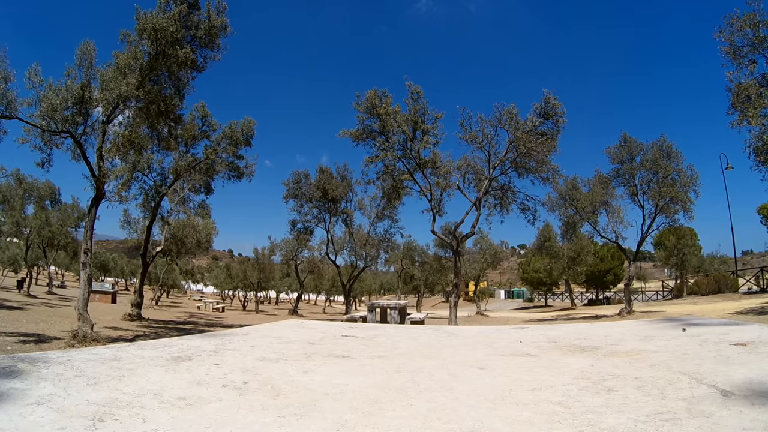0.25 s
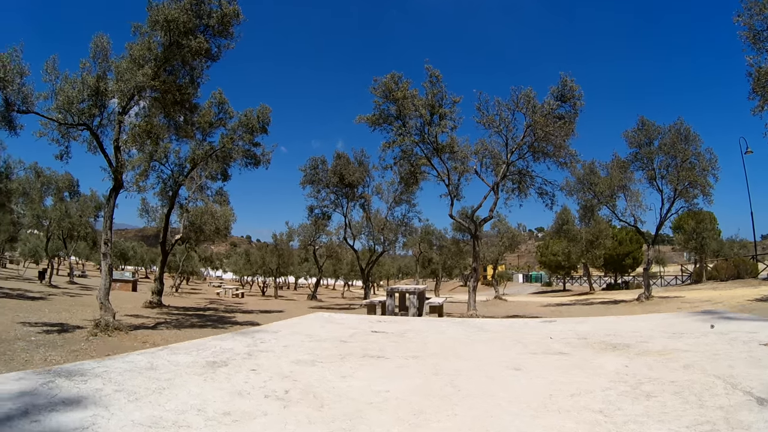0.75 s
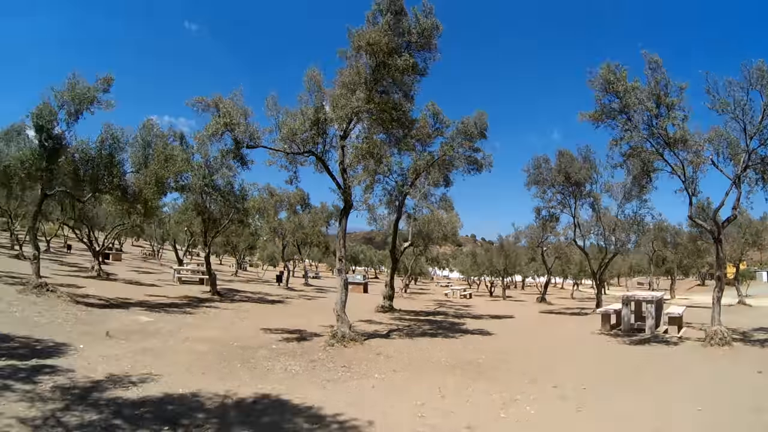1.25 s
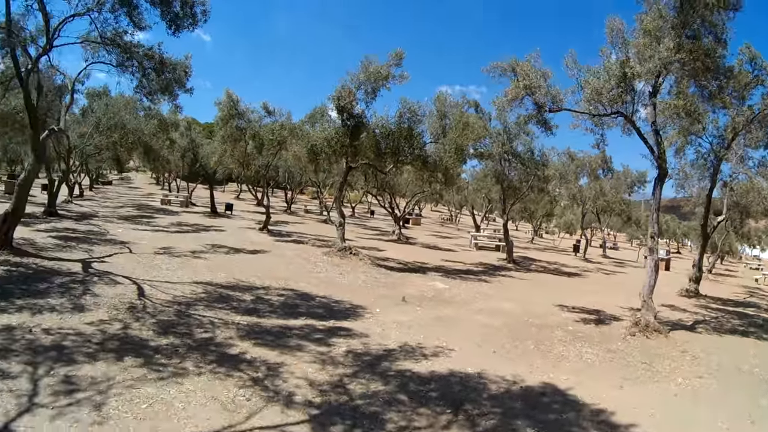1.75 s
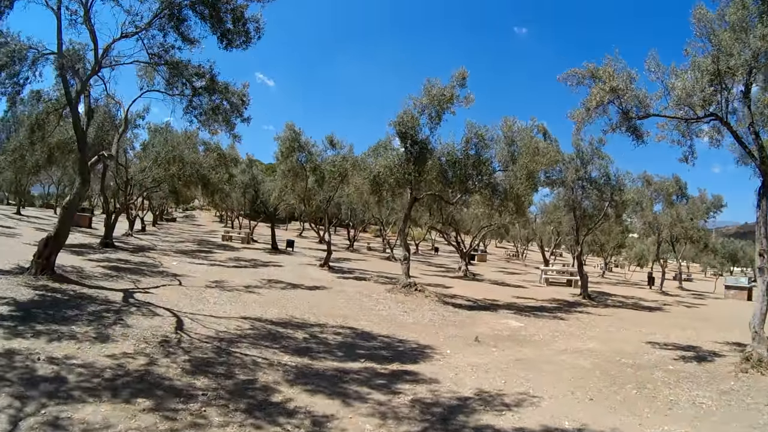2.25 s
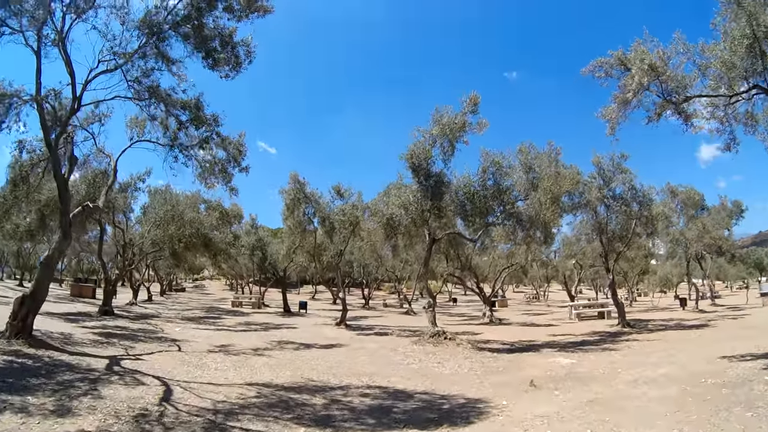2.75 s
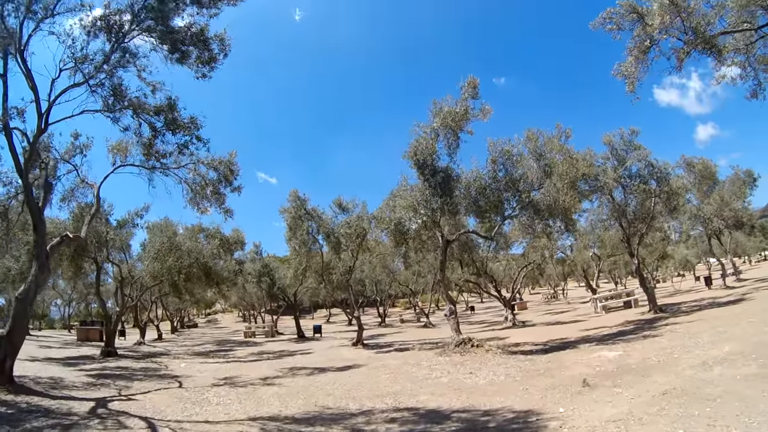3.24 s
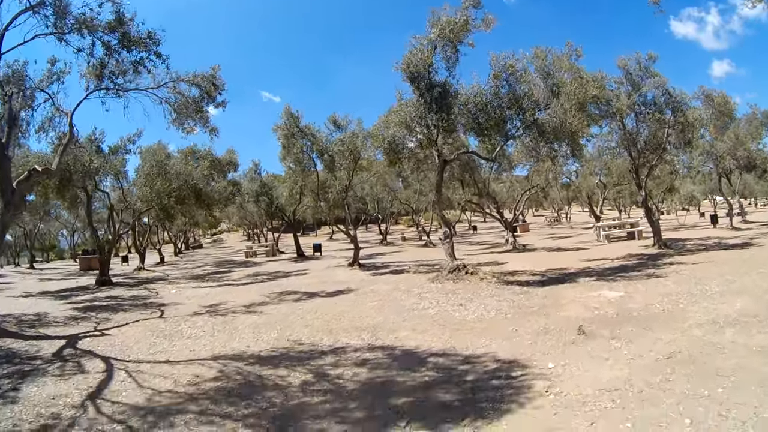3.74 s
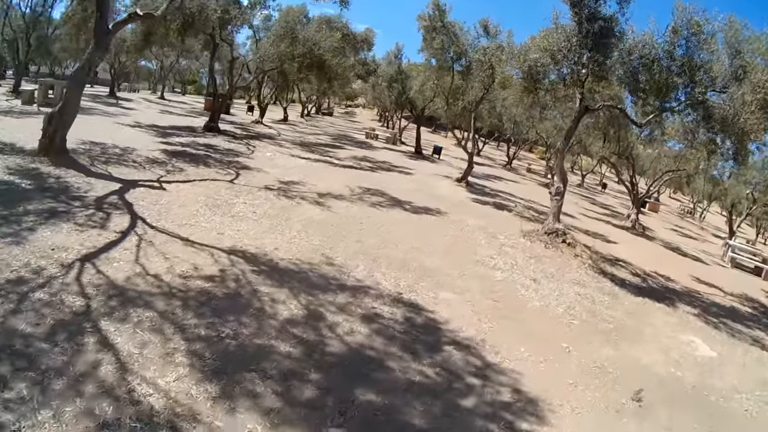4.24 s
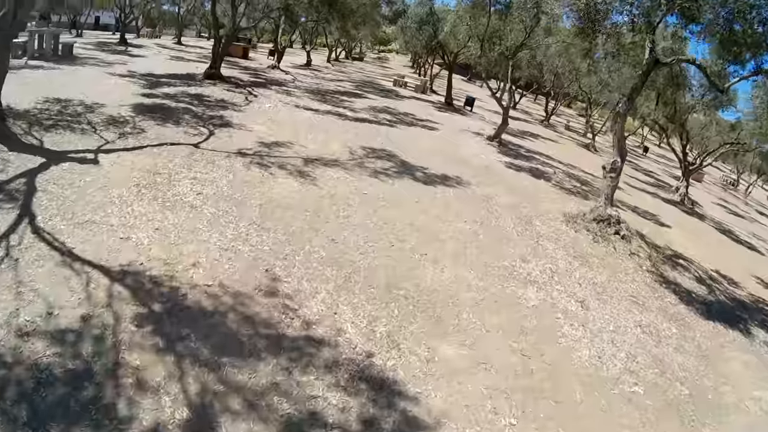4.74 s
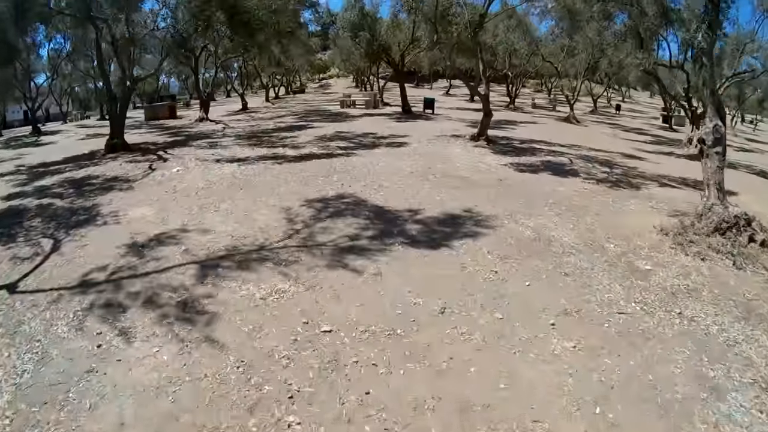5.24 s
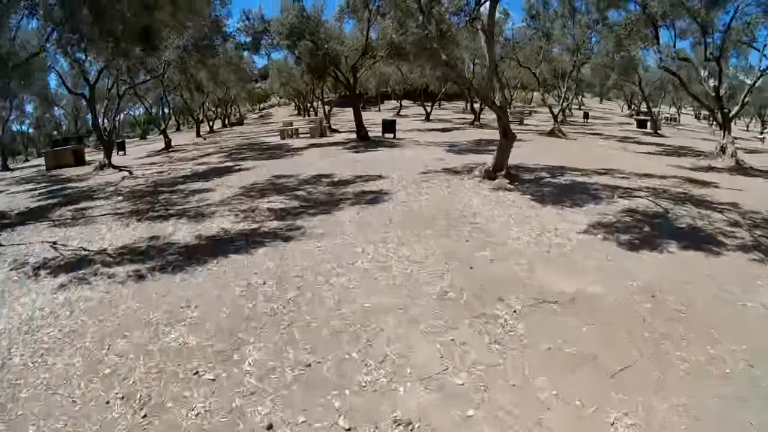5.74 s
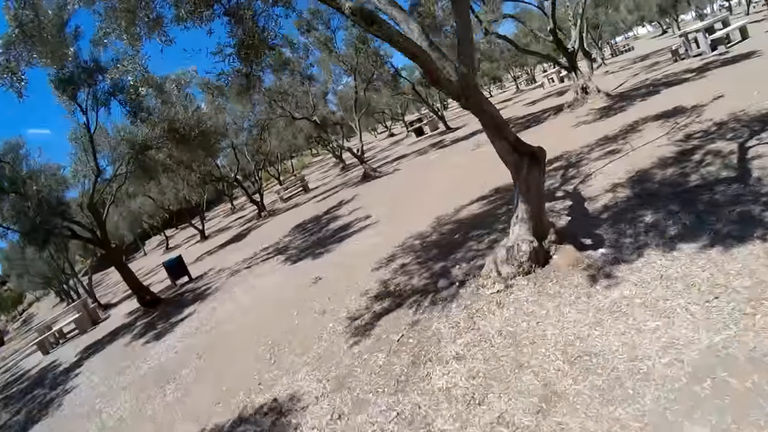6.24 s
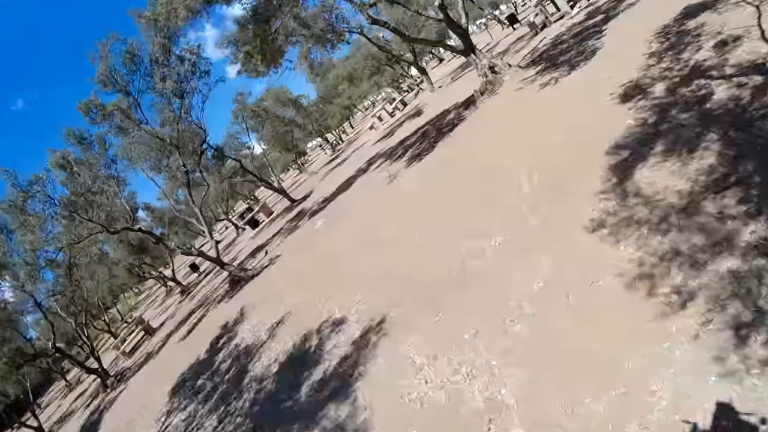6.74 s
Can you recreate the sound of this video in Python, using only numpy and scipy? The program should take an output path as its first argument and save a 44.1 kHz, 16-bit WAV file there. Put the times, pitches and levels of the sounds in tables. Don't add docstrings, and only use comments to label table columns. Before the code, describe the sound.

Small drone rotors idle softly for half a second, then leap to a loud, beating whine that strains and crackles in the onboard microphone.

```python
import sys
import numpy as np
from scipy import signal
from scipy.io import wavfile
from scipy.ndimage import uniform_filter1d

SR = 44100
rng = np.random.default_rng(int(sys.argv[2]) if len(sys.argv) > 2 else 0)


def store_wav(level_fs):
    pcm = np.round(np.clip(np.atleast_2d(level_fs), -1, 1) * 32767)
    wavfile.write(sys.argv[1], SR, pcm.T.astype(np.int16))


def to_linear_factor(level_db):
    exponent = np.asarray(level_db, float) / 20
    return 10 ** exponent


N = 308259

# t/s, blade rate f/Hz, tone level/dB
LEAD_ROTOR = [(0, 172, -41.5), (.1, 157.1, -47.5), (.4, 223.1, -44), (.5, 296, -23.5), (.62, 363.3, -20.5),
              (.8, 407.1, -17.5), (1, 431.7, -17), (1.3, 423.2, -19), (1.55, 368.8, -16.5),
              (1.9, 389.8, -15), (2.8, 401.1, -14), (3.55, 388.5, -13.5), (4.15, 377.7, -13.5),
              (4.72, 357.9, -17.5), (5.15, 374.5, -19), (5.8, 381.1, -17), (6.15, 345.4, -20.5),
              (6.85, 376.6, -20)]
LOW_ROTOR = [(0, 158.8, -44.5), (.3, 184.7, -41), (.46, 261, -22.5), (.57, 258.8, -24.5),
             (.81, 349.9, -22.5), (1.05, 330.5, -20), (1.7, 336, -23), (2.2, 386.8, -22),
             (2.82, 381.5, -18), (3, 352, -26.5), (3.5, 345.3, -22.5), (3.85, 379.8, -21), (4.2, 377, -20),
             (4.35, 339.4, -21.5), (4.87, 314.5, -28), (5.2, 343.6, -24.5), (6.2, 277.6, -30),
             (6.85, 332.3, -28)]
HIGH_ROTOR = [(.7, 415, -32), (1, 472, -20.5), (1.25, 436.3, -25.5), (1.5, 396.1, -37), (2.4, 419, -30),
              (2.82, 467.1, -21), (3.02, 432.2, -22.5), (3.3, 422.8, -18), (3.55, 427.3, -29),
              (3.8, 416.3, -13.5), (4, 390.2, -21.5), (4.27, 409.4, -47), (4.6, 404.6, -26.5),
              (5, 445, -20.5), (6, 448.2, -25), (6.15, 414.9, -22), (6.6, 422, -26), (6.85, 456.5, -24)]
NEAR_ROTOR = [(5.5, 443.6, -45.5), (5.9, 451, -28), (6.05, 397.2, -24.5), (6.18, 374, -23.5),
              (6.4, 500, -26.5), (6.55, 523.4, -33), (6.7, 500, -19), (6.85, 436, -21), (6.98, 434, -20)]
# start t/s, length t/s, ramp t/s, rise of blade rate f/Hz
SURGES = [
    (1.928, 0.24, 0.13, 33),
    (2.8, .73, .19, 56),
    (3.56, 0.44, 0.22, 69),
    (3.902, .2, 0.098, 30),
    (4.26, .2, 0.077, 20),
    (4.37, 0.34, .12, 74),
    (2.46, .2, 0.0985, -9),
    (5.15, .91, .14, 46),
    (5.35, .2, .1, -15.5),
    (6.22, 0.61, 0.15, 66),
]
# start t/s, length t/s, ramp t/s, rise of blade rate f/Hz
STEERING = [
    (.59, .16, 0.07045, 14),
    (1.14, .26, 0.1199, 13),
    (1.4, 0.19, .1, 25),
    (2.56, .2, .08, -7),
    (4.4, .26, 0.1007, 12),
    (4.9, 0.26, .1, 10),
]


def four_rotors():
    surge_hz, steer_hz = pushes(SURGES), pushes(STEERING)
    return [
        rotor(LEAD_ROTOR, surge_hz - .3 * steer_hz, surge_db=1.07, rich_db=-0.4, mid_db=0.5, top_db=-2.5),
        rotor(LOW_ROTOR, .4 * surge_hz + steer_hz, surge_db=5.0, rich_db=-1.5, mid_db=2.0, top_db=-2),
        rotor(HIGH_ROTOR, surge_hz, surge_db=-0.5, rich_db=-1.5, mid_db=-3.5, top_db=8.5),
        rotor(NEAR_ROTOR, 0 * surge_hz, surge_db=0, rich_db=3.0, mid_db=-1, top_db=-3),
    ]


# multiple of the blade rate, level/dB
ORDERS = [(.5, -30), (1, 0), (1.5, -36), (2, -11), (3, -18), (3.5, -31), (4, -21), (4.5, -30), (5, -28),
          (6, -31), (7, -34), (8, -35), (9, -36), (10, -37), (12, -38)]
# t/s, lift of the octave level/dB, lift of higher orders level/dB
SHARPNESS = [(.3, 12, 7), (.5, 5, 9), (.7, -3, -2), (1.4, -2, -5), (1.6, 4, -6), (2.1, 3, -4), (2.3, 1, -4),
             (3.4, 1, -2), (3.8, 0, 1), (4.9, 0, 0), (5.4, 4, 12), (5.9, 4, 13), (6.15, 4, 8), (6.5, 4, 13),
             (6.9, 2, 4)]


def rotor(rows, surge_hz, surge_db, rich_db, mid_db, top_db):
    hz = curve(rows, 1) + surge_hz
    wobble = 1 + .005 * drift(hz=13) + .0012 * drift(hz=45)
    angle = 2 * np.pi * np.cumsum(hz * wobble) / SR

    octave_lift = to_linear_factor(rich_db + curve(SHARPNESS, 1))
    middle_lift = to_linear_factor(curve(SHARPNESS, 2)) * to_linear_factor(mid_db)
    top_lift = to_linear_factor(top_db - (curve(rows, 2) + 22) / 2)
    gusts = [drift(hz=24.937) for _ in range(3)]

    tone = to_linear_factor(-7) * np.clip(hz / 70 - 4.3, 0, 1) * np.cos(21 * angle)
    for n, (order, db) in enumerate(ORDERS):
        if order > 5.5:
            lift = top_lift
        elif order > 2:
            lift = middle_lift
        elif order > 1:
            lift = octave_lift
        else:
            lift = 1
        gain = to_linear_factor(db) * (1 + min(.2 * order, .4) * gusts[n % 3]) * lift
        phase = order * angle + 2 * np.pi * rng.random()
        tone += gain * np.cos(phase % (2 * np.pi))

    first_s = rows[0][0]
    start = np.clip((np.arange(N) / SR - first_s) / .08 + (first_s < .05), 0, 1)
    loudness = to_linear_factor(curve(rows, 2) + surge_db * surge_hz / 60)
    return np.sqrt(2) * loudness * start * tone, angle


def pushes(rows):
    return sum(hz * plateau(start, length, ramp) for start, length, ramp, hz in rows)


def plateau(start, length, ramp):
    t = np.arange(N) / SR - start
    return np.clip(np.minimum(t, length - t) / ramp, 0, 1)


# t/s, blade-tip hiss level/dB
AIRFLOW = [(0, -64), (.11, -52), (.29, -50), (.6, -29.5), (.97, -31), (1.67, -35), (2.32, -35.5),
           (3.62, -35.5), (3.93, -33.5), (4.1, -37), (4.4, -37), (4.54, -35.5), (4.77, -38), (5.49, -30.5),
           (6.2, -38), (6.3, -34), (6.7, -30), (6.9, -33.5)]
# f/Hz, level/dB per Hz
HOUSING = [(60, -51), (130, -39.5), (200, -20.5), (500, -16.5), (1100, -15), (1400, -6), (1550, -4.5),
           (1670, 2.5), (1790, -6), (2000, -14.5), (2700, -27.5), (5000, -43), (11000, -53.5)]
# f/Hz, level/dB per Hz
TIPS = [(120, -37.5), (300, -2), (1000, -1.5), (2400, -2), (2800, -9.5), (4000, -11.5), (5000, -8.5),
        (6200, -5), (8000, -4.5), (13000, -33)]


def wash(angle):
    air_db = curve(AIRFLOW, 1)
    housing_db = -25.5 + 0.061 * (air_db + 36) + 0.1 * overload() / 100
    housing = to_linear_factor(housing_db) * hiss(HOUSING, patchy_db=1.8)
    tips = to_linear_factor(air_db + 9.5) * hiss(TIPS, patchy_db=1.5)
    return housing + tips * (1 + 0.26 * np.cos(angle))


# t/s, signed area/(full scale x ms)
FLIPS = [(.5506, 1.05), (.6088, -0.89), (.7003, -0.69), (0.7172, -0.15), (1.003, 0.22), (1.1355, -0.42),
         (1.2735, 0.31), (1.3112, -1.3), (1.3672, 0.41), (1.4305, -0.15), (1.6461, -0.26), (1.8863, -1.1),
         (1.9212, 0.34), (1.9849, -0.37), (1.9975, -0.25), (2.3523, 0.57), (2.4032, -1), (3.5912, -1.1),
         (3.6338, .45), (4.4566, -0.45), (4.4833, -1), (4.5828, 0.97), (4.9651, 0.12), (5.0292, -0.74),
         (5.1529, 0.29), (5.201, -0.41), (6.0087, -0.83), (6.2338, .26), (6.8431, 0.66), (6.9137, .63)]
# t/s, signed area/(full scale x ms), further passes
CRESTS = [(0.6869, 0.69, 0.5), (1.0236, 0.72, 1), (1.054, .47, 3.5), (1.0855, -0.66, 3.5),
          (1.4106, 0.66, 1), (1.5769, -0.52, 1.5), (1.7627, 0.75, 4.5), (2.3244, -.53, 2.5),
          (2.4903, 1.36, 1), (2.555, -.67, 5), (2.6661, 0.66, 3), (2.7359, -1.32, 2), (2.7863, -0.89, 2.5),
          (2.8659, 0.73, 0), (3.4458, -0.94, 1.5), (3.9589, -1.334, 4), (3.9717, 0.72, 6.5),
          (4.022, -0.79, 4.5), (4.0822, -0.81, 6), (4.1812, 0.59, 2), (4.1956, -1.2, 3.5), (4.502, -.7, 1),
          (4.5152, 0.68, 5.5), (4.9239, 1.08, 4), (5.0381, 1.4, 0.5), (5.0885, 0.81, 6.5),
          (6.8977, 0.34, 2), (6.9374, 0.25, -1), (6.9704, -0.41, 3.5)]


def overflow(x, height, typical_ms, swing, swing_hz, swing_ms):
    chance, side, spread, pitch, force = rng.random((N, 5)).T
    rate, size = overload(), typical_ms * overload(column=3)
    crest = uniform_filter1d(x ** 2, size=260) / (uniform_filter1d(x ** 2, size=6000) + 1e-9)
    runs = np.flatnonzero(chance < .8 * abs(crest) ** 1.5 * (rate - 12) / SR)
    brief = (1 + rate / 250) ** -.5

    flips = []
    for at in runs:
        area_ms = np.sign(side[at] - .5) * size[at] * (.2 + 1.6 * spread[at]) * brief[at]
        flips.append((at, area_ms))
    flips += [(round(s * SR), area_ms) for s, area_ms in FLIPS]
    pass_ms, follower_ms = 2.6, 0.28
    for s, area_ms, more in CRESTS:
        flips.append((round(s * SR), area_ms))
        for k in range(round(more)):
            steps = (k // 2 + 1) * (-1) ** k
            at = round(SR * (s + steps * pass_ms / 1000))
            flips.append((at, follower_ms * (4 * side[at] - 2)))

    out = np.append(x, np.zeros(300))
    reach = np.arange(-220, 221)
    ms = 1000 * reach / SR
    for at, area_ms in flips:
        pulse = np.exp(-abs(1.8 * ms * height / (abs(area_ms) + .15)) ** 3)
        turns = swing_hz * 2 ** ((.6 + rate[at] / 330) * pitch[at] ** 2) * ms / 1000
        fade = np.exp(-(ms / (swing_ms * brief[at])) ** 2)
        ring = swing * force[at] * fade * np.sin(2 * np.pi * turns)
        out[at + reach] += pulse / pulse.sum() * area_ms * SR / 1000 + ring
    return out[:N]


# start t/s, length t/s, overflows per s, size x typical
OVERLOAD = [
    (0.71, 0.3, 250, 0.89),
    (1.988, 0.21, 160, 1.7),
    (2.848, 0.58, 194, 1.8),
    (3.651, 0.29, 277, 1.7),
    (5.196, .82, 410, 1.35),
    (6.245, 0.59, 373, 1.25),
]


def overload(column=2):
    return sum(row[column] * plateau(row[0], row[1], ramp=.045) for row in OVERLOAD)


# f/Hz, level/dB per Hz
CONVERTER = [(5800, -43), (6800, -0.5), (8800, 4), (10000, -6.5), (11500, -19.5), (14000, -34.5)]


def converter_noise():
    return to_linear_factor(curve(AIRFLOW, 1) + 24.5) * hiss(CONVERTER, patchy_db=-3.0)


def hiss(points, patchy_db):
    frames, hz = N // 256 + 5, np.fft.rfftfreq(1024, 1 / SR)
    a, b, patches = rng.standard_normal((frames, 513, 3)).T
    patches = uniform_filter1d(patches, size=10, axis=0)
    patches = evened(uniform_filter1d(patches, size=8, axis=1))
    f, db = np.transpose(points)
    colour_db = np.interp(np.log(hz + 1), np.log(f), db, left=-90)
    spectra = (a + 1j * b) * to_linear_factor(colour_db[:, None] + patchy_db * patches)
    return evened(signal.istft(spectra, nperseg=1024, noverlap=768)[1][:N])


def drift(hz):
    knots = rng.standard_normal(3000)
    return np.interp(np.arange(N) * hz / SR, np.arange(3000), knots)


def curve(rows, column):
    rows = np.asarray(rows, float)
    return np.interp(np.arange(N) / SR, rows[:, 0], rows[:, column])


def evened(x):
    return x / np.sqrt(np.mean(x ** 2) + 1e-20)


def scene():
    rotors = four_rotors()
    lead_angle = rotors[0][1]
    return (sum(tone for tone, angle in rotors) + wash(lead_angle))[None]


def low_pass(x):
    return signal.sosfilt(signal.butter(12, 15700, fs=SR, output="sos"), x)


def record(dry):
    bass_cut = signal.butter(4, 120, "high", fs=SR, output="sos")
    x = signal.sosfilt(bass_cut, dry[0])
    x = overflow(x, height=1.0, typical_ms=0.42, swing=0.64, swing_hz=500, swing_ms=1.3)
    ceiling = .8
    x = x / (1 + abs(x / ceiling) ** 14) ** (1 / 14)
    x = x + converter_noise()
    x = signal.lfilter(*signal.iirnotch(700, 18.0, fs=SR), x)
    x = np.convolve(x, signal.firwin(41, 4600, fs=SR), "same")
    return low_pass(x[None])


dry = scene()
out = record(dry)
store_wav(out)
```